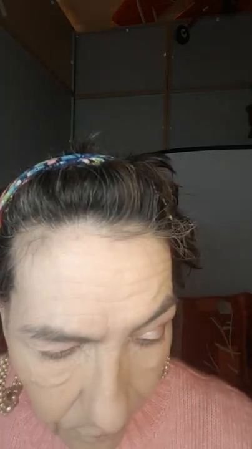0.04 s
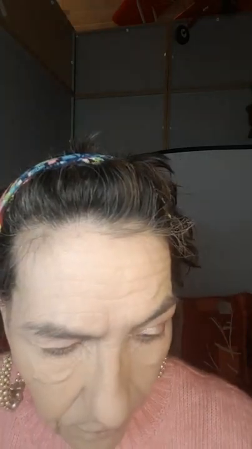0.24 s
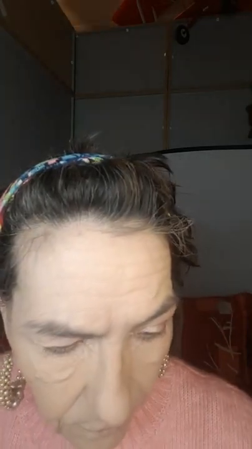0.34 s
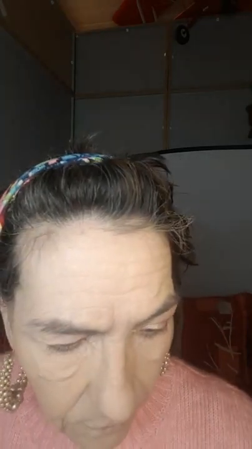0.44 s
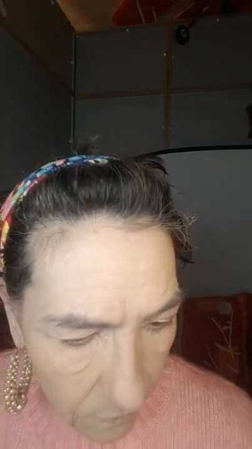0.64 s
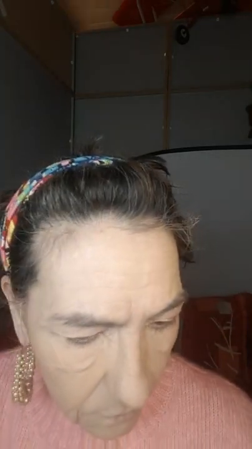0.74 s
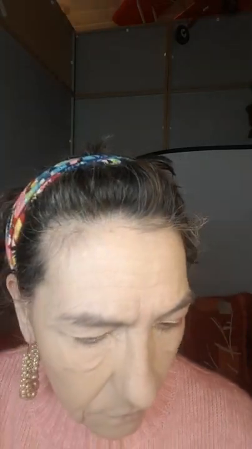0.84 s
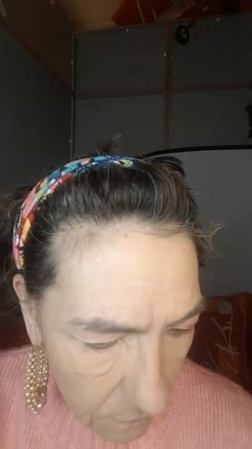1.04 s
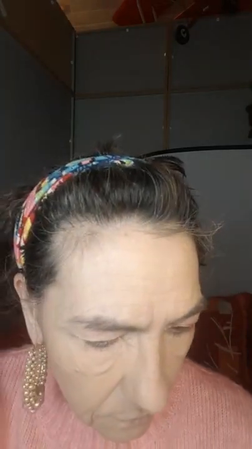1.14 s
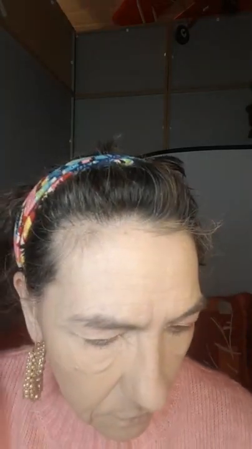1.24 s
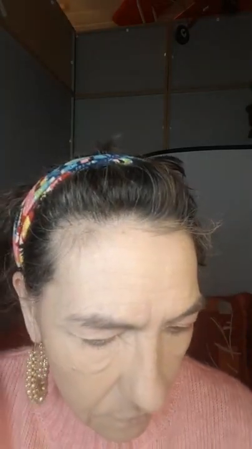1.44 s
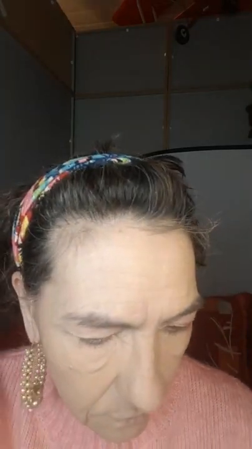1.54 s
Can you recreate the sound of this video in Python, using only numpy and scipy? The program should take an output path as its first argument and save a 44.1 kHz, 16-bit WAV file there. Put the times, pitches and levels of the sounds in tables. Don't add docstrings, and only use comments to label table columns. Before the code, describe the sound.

Light plastic clatter of cosmetic cases and brush handles dropped and shuffled in a tray indoors

```python
import sys
import numpy as np
from scipy import signal
from scipy.fft import rfft, irfft, next_fast_len
from scipy.io import wavfile
from scipy.ndimage import uniform_filter1d

SR = 44100
rng = np.random.default_rng(int(sys.argv[2]) if len(sys.argv) > 2 else 0)


def invert_db(level):
    return 10 ** (np.asarray(level, dtype=float) / 20)


def to_wav(s):
    ch = np.atleast_2d(s).T
    pcm = np.round(np.clip(ch, -1, 1) * 32767)
    wavfile.write(sys.argv[1], SR, pcm.astype(np.int16))


N = 70560


def unit(x):
    return x / np.sqrt(np.mean(x ** 2) + 1e-20)


def along(points, hz):
    point_hz, value = np.transpose(points)
    return np.interp(np.log(hz + 1), np.log(point_hz + 1), value)


def filtered(x, response):
    m = next_fast_len(len(x) + 8192)
    return irfft(rfft(x, m) * response(np.fft.rfftfreq(m, 1 / SR)), m)[:len(x)]


def low_cut(x, hz):
    return signal.sosfilt(signal.butter(4, hz, "high", fs=SR, output="sos"), x)


def add(track, start_s, sound):
    part = track[max(round(start_s * SR), 0):][:len(sound)]
    part += sound[:len(part)]


def ring(modes, spread_db, attack_s, snap):
    contact_s, damping_cycles = 0.00068, 36
    t = np.arange(SR // 4) / SR
    hz, db, t60_s = np.transpose(modes)[:, :, None]
    level_luck, pitch_luck = rng.standard_normal((2, len(modes), 1))
    decay_s = np.minimum(t60_s, damping_cycles / hz + .008)
    envelope = invert_db(db + spread_db * level_luck - 60 * t / decay_s)
    waves = envelope * np.sin(2 * np.pi * hz * (1 + .008 * pitch_luck) * t)
    return -waves.sum(0) * (1 - np.exp(-t / attack_s)) * (1 + snap * np.exp(-t / contact_s))


def floor():
    # (frequency [Hz], density [dB per Hz])
    hiss_spectrum = [(20, -15), (70, -2.5), (130, -10), (300, -13.5), (1000, -16.5), (6000, -31),
                     (10000, -33.5), (13000, -30)]
    hum_hz, whine_hz, whine_ends_s = 97.3, 14150, 1.4
    t = np.arange(N) / SR
    hiss = unit(filtered(rng.standard_normal(N), lambda hz: invert_db(along(hiss_spectrum, hz))))
    hum = unit(filtered(rng.standard_normal(N), lambda hz: 1 / (1 + ((hz - hum_hz) / 6) ** 2)))
    whine = np.sin(2 * np.pi * whine_hz * t) * np.clip((whine_ends_s - t) / .03, 0, 1)
    return invert_db(-71.5) * hiss + invert_db(-83) * hum + invert_db(-90) * whine


def room(x):
    # (frequency [Hz], t60 [s])
    room_decay = [(200, 0.53), (700, 0.1), (2000, 0.19), (5000, 0.099), (12000, 0.13)]
    tail_db, wall_db = -11, -24
    out, block = np.zeros(N), SR // 20
    for k in range(0, N, block):
        hz, t, bins = signal.stft(rng.standard_normal(SR // 2), SR, nperseg=256)
        bins = bins * invert_db(-60 * t / along(room_decay, hz)[:, None])
        tail = signal.istft(bins, SR, nperseg=256)[1]
        tail *= np.clip(np.arange(len(tail)) / (0.013 * SR), 0, 1)
        tail *= invert_db(tail_db) / np.linalg.norm(tail)
        tail[rng.integers(SR // 400, SR // 50, size=6)] += invert_db(wall_db) * rng.uniform(-0.43, 1, size=6)
        add(out, k / SR, signal.fftconvolve(x[k:k + block], tail))
    return out


def table_thuds():
    # (frequency [Hz], level [dB], t60 [s])
    table_modes = [(125, 4, 0.02), (156.3, -1, 0.099), (166, -6.5, 0.13), (237.4, 3.5, 0.097),
                   (243.8, -10, 0.29), (259.8, 2, 0.13), (305.4, 0.5, 0.21), (363, -15, 0.039)]
    # (time [s], level [dB])
    thuds = [
        (.208, -45.5),
        (0.227, -44),
        (0.247, -71),
        (0.347, -50.5),
        (.41, -51.5),
        (.446, -46),
        (0.467, -53.5),
        (0.533, -53.5),
        (0.8, -66),
        (0.995, -67.5),
    ]
    out = np.zeros(N)
    for s, db in thuds:
        add(out, s, invert_db(db) * ring(table_modes, spread_db=2, attack_s=.005, snap=0))
    return low_cut(out, 104)


def hinge():
    pin_hz = [5250, 5420]
    # (time [s], level [dB])
    pin_hits = [
        (.0096, -62.5),
        (.2075, -70),
        (0.504, -65),
        (0.5314, -50),
        (0.5457, -64),
        (.5670, -65),
        (.586, -67),
        (.616, -69),
    ]
    t60_s = .11
    out, t = np.zeros(N), np.arange(SR // 4) / SR
    pair = sum(np.sin(2 * np.pi * hz * t) for hz in pin_hz)
    for s, db in pin_hits:
        add(out, s, invert_db(db - 6 - 60 * t / t60_s) * pair)
    return out


def scrapes():
    # (time [s], length [s], level [dB], centre [Hz], width over centre [-])
    slides = [(0, 0.006, -62, 3000, 2.8), (.012, 0.0218, -72, 1100, 0.36), (0.226, 0.011, -49.5, 6944, 5.7),
              (0.257, 0.0055, -83, 5920, 4), (0.389, 0.0067, -55, 5556, 0.52), (0.41, 0.016, -75, 11200, 1),
              (0.525, 0.0051, -59, 9000, 2.4), (0.745, 0.002, -70, 8800, 1.9),
              (.799, 0.0032, -65, 8333, 1.8), (0.797, 0.0094, -66, 10470, 0.19),
              (0.889, 0.0073, -60, 5800, 1.14), (0.916, 0.0075, -64, 4074, 1),
              (0.94, 0.0066, -68.5, 7315, 2.6), (0.965, 0.0041, -68.5, 3000, 1.4),
              (0.981, 0.0052, -75, 4300, 0.82), (1.15, .001, -76.5, 9000, 1.8),
              (1.157, 0.0013, -74, 8000, 2.6), (.501, 0.0051, -50, 5200, 1.8),
              (0.701, 0.066, -69, 1400, 0.32), (0.603, 0.16, -66, 1852, 0.84),
              (.2325, .004, -55, 4700, .3),
        (.891, .005, -66, 4500, .12),
        (.347, .002, -47, 3950, .14),
        (.392, .003, -53, 4000, .15),
        (.506, .075, -66, 2500, 1.5),
    ]
    out, t = np.zeros(N), np.arange(SR // 10) / SR
    for s, length_s, db, hz, share in slides:
        grain_db = 2 * unit(uniform_filter1d(rng.standard_normal(len(t)), size=40))
        grain = rng.standard_normal(len(t)) * invert_db(grain_db)
        width_hz = share * hz
        band = unit(filtered(grain, lambda f: (1j * f * width_hz / (hz * hz - f * f + 1j * f * width_hz)) ** 2))
        fade = invert_db(-60 * np.clip(t - length_s, 0, 1) / .012)
        add(out, s, invert_db(db) * band * np.clip(t / .001, 0, 1) * fade)
    return out


def crowded(modes):
    hz, db, t60_s = np.transpose(modes)
    more_hz = hz[0] * (hz[-1] / hz[0]) ** rng.uniform(-0.096, 1.15, size=14)
    more_db = np.interp(more_hz, hz, db) - 13
    more_t60_s = np.interp(more_hz, hz, t60_s) * .9
    return np.vstack([modes, np.transpose([more_hz, more_db, more_t60_s])])


def tick(db):
    # (frequency [Hz], level [dB])
    tick_spectrum = [(2500, 4), (4500, -1), (6500, -1.5), (8000, -1.5), (8900, 5.5), (10000, -8),
                     (12000, -8), (14200, -15)]
    t60_s, attack_s = 0.0099, 0.00015
    t = np.arange(SR // 20) / SR
    noise = unit(filtered(rng.standard_normal(len(t)), lambda hz: invert_db(along(tick_spectrum, hz))))
    return invert_db(db - 60 * t / t60_s) * noise * (1 - np.exp(-t / attack_s))


def contacts():
    # (time [s], object level [dB], tray level [dB], tick level [dB])
    case_hits = [(.0096, -37.5, -56.5, -52), (.0188, -47.5, -62, -67), (.1925, -39.5, -57, -54.5),
                 (.2075, -26, -23.5, -33.5), (.2119, -35.5, -36, -73), (.2148, -58, -31.5, -76),
                 (.2205, -40, -37.5, -75), (.2253, -26, -25, -37), (.2298, -48, -39.5, -50),
                 (.2335, -33.5, -51, -37), (.2385, -27.5, -36, -63), (.2465, -36, -30.5, -65),
                 (.2520, -46, -47, -73), (.2608, -33, -36, -55), (.2685, -43.5, -61, -79)]
    brush_hits = [
        (.3470, -18.5, -25.5, -42.5),
        (.3510, -55, -34.5, -49),
        (.3646, -23.5, -34.5, -64),
        (.3776, -26.5, -31.5, -70),
        (.3868, -28, -33, -72),
        (.3916, -23.5, -33.5, -40),
        (.4102, -20, -30, -49),
        (.4240, -28, -36, -71),
        (.4170, -43, -41, -73),
    ]
    rattle_hits = [
        (.4340, -33, -32, -64),
        (.4372, -47, -40, -38.5),
        (.4462, -29.5, -30.5, -50),
        (.4517, -35.5, -40.5, -79),
        (.4545, -44, -37, -78),
        (.4590, -38.5, -41, -50),
        (.4700, -53, -52, -72),
    ]
    lid_hits = [
        (.5043, -20, -36, -26.5),
        (.5058, -33.5, -57, -30.5),
        (.5158, -44, -38, -66),
        (.5210, -48, -38, -71),
        (.5095, -43, -63, -69),
        (.5322, -24.5, -38, -37),
        (.5365, -50, -42, -64),
        (.5477, -27.5, -39, -42),
        (.5670, -31, -44, -67),
        (.5775, -47, -42, -56),
    ]
    cap_hits = [
        (.9944, -22.5, -46.5, -57.5),
        (.9998, -30.5, -46, -55),
        (1.0040, -43, -60, -77),
        (1.0180, -44, -52, -78),
    ]
    # (time [s], object level [dB], tray level [dB])
    handle_hits = [(.6160, -43, -42.5), (.6280, -40, -60), (.6378, -46, -38.5), (.6445, -48, -46.5),
                   (.6515, -45, -42), (.6905, -39.5, -41.5), (.7000, -42.5, -47), (.7060, -44, -49),
                   (.6700, -49, -62), (.8912, -42.5, -45.5), (.9183, -35, -37), (.9300, -51, -94),
                   (.9612, -48.5, -55), (.9783, -44, -42), (.8960, -44, -60), (.9020, -42, -47.5),
                   (1.065, -60, -61.5), (1.088, -63, -59.5), (1.1140, -80, -61), (1.4880, -80, -65.5),
                   (1.497, -72, -64.5)]
    # (frequency [Hz], level [dB], t60 [s])
    case_modes = [(1100, -4.5, 0.06), (1293, -0.5, 0.038), (1498, -6, 0.08), (1878, -4, 0.045),
                  (2272, -7, .025), (2866, -0.5, 0.012), (3630, -11.5, 0.025), (4300, -7.5, .015),
                  (5080, -10, 0.012)]
    brush_modes = [(1110, -1.5, 0.028), (1420, -1.5, 0.018), (1613, -6, 0.031), (1814, -8, 0.12),
                   (2270, 4.5, 0.0099), (2496, -15, 0.039), (2800, -18, 0.031), (3220, -12.5, 0.019),
                   (3640, -5, 0.0057), (3870, -3, 0.0092), (4600, -9.5, 0.013), (5120, -19, 0.022),
                   (5610, -17.5, .02), (8930, -23, 0.0103)]
    rattle_modes = [(990, -20, .03), (1190, 2, 0.02), (1625, 2, .04), (1840, -0.5, 0.034),
                    (2330, 3.5, 0.015), (3000, 1, 0.011), (3710, -7, 0.011), (4800, -10, 0.0093)]
    lid_modes = [(1125.6, -6, 0.031), (1434, -4, 0.036), (1603, -4.5, 0.05), (1818, -5, 0.035),
                 (2326, -3, 0.034), (2820, -13, 0.028), (3285, 0, 0.027), (3560, 0, 0.025),
                 (3933, 0, 0.012), (5355, -10, 0.028), (5580, -10, 0.014), (7070, -11.5, .018),
                 (8630, -20, 0.0097), (9400, -9.5, 0.0044)]
    cap_modes = [(975, -13, .03), (1220, -7, .03), (1440, -4, .033), (1852, 0, .027), (2379, -13, .025),
                 (2615, -10, .025), (3250, -11, .018), (3650, -13, .012), (4510, -18, .015)]
    handle_modes = [(1140, 4, 0.016), (1564, 3.5, 0.017), (1885, -3, 0.081), (2300, -2, 0.012),
                    (2720, -22, 0.011)]
    # (frequency [Hz], level [dB], t60 [s])
    tray_modes = [(549, -7, 0.09), (587, -1, 0.052), (693, -5.5, 0.075), (710, -10.5, 0.042),
                  (819, -0.5, 0.055), (846, -7, 0.014), (911, -12, 0.049), (996, -8.5, 0.045)]
    corner_modes = [(401, -2.5, 0.042), (540, -14.5, 0.05), (605, -5, 0.074), (685, 1.5, .07),
                    (722, -9.5, 0.036), (800, -10, 0.021), (914, -4.5, 0.044)]
    object_gain_db, tray_gain_db, snap, soft_hz = -11.5, -7, 1.094, 2750
    hard, soft = np.zeros(N), np.zeros(N)
    for hits, modes in [(case_hits, case_modes), (brush_hits, brush_modes), (lid_hits, lid_modes),
                        (handle_hits, handle_modes), (cap_hits, cap_modes), (rattle_hits, rattle_modes)]:
        for s, object_db, tray_db, *tick_db in hits:
            body = ring(crowded(modes), spread_db=1.5, attack_s=0.00046, snap=snap)
            add(hard if tick_db else soft, s, invert_db(object_db + object_gain_db) * body)
            tray = ring(tray_modes if tick_db else corner_modes, spread_db=2, attack_s=0.00022, snap=snap)
            add(soft, s, invert_db(tray_db + tray_gain_db) * tray)
            for db in tick_db:
                add(hard, s, tick(db))
    softened = filtered(soft, lambda hz: 1 / (1 + 1.4j * hz / soft_hz - (hz / soft_hz) ** 2))
    return low_cut(hard + softened, 572)


def scene():
    handling = contacts() + table_thuds() + scrapes() + hinge()
    near = filtered(handling, lambda hz: hz < 14250)
    return (near + room(near) + floor())[None]


def top_cut(x):
    return signal.sosfilt(signal.butter(12, 15610, fs=SR, output="sos"), x)


def record(dry):
    mic_cut_hz, top_hz, shelf_db = 45, 14350, -17
    mix = filtered(dry[0], lambda hz: np.where(hz < top_hz, hz / np.hypot(hz, mic_cut_hz), invert_db(shelf_db)))
    return top_cut(mix[None])


dry = scene()
out = record(dry)
to_wav(out)
```